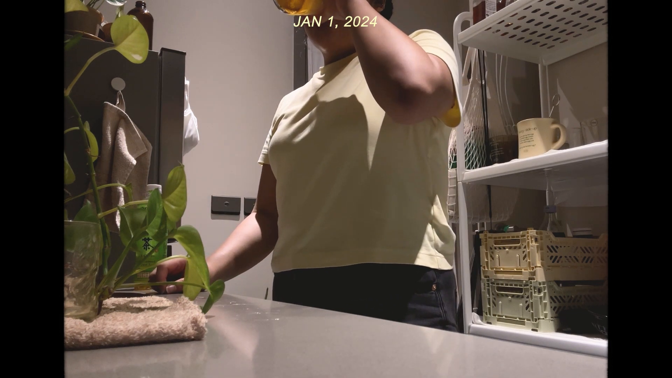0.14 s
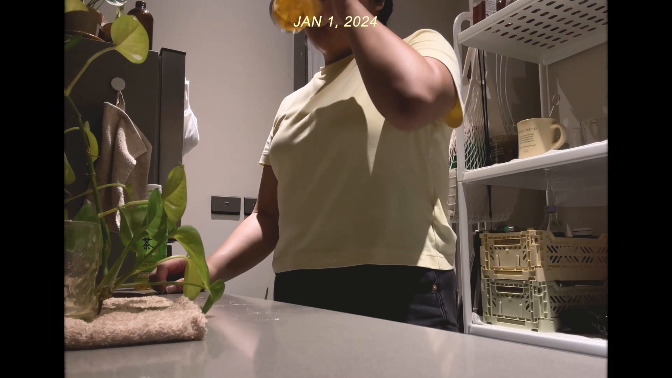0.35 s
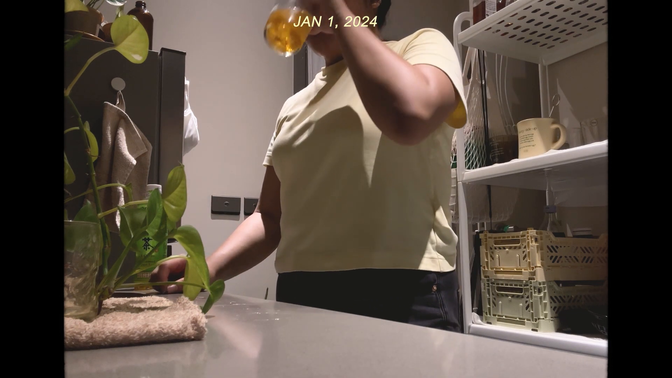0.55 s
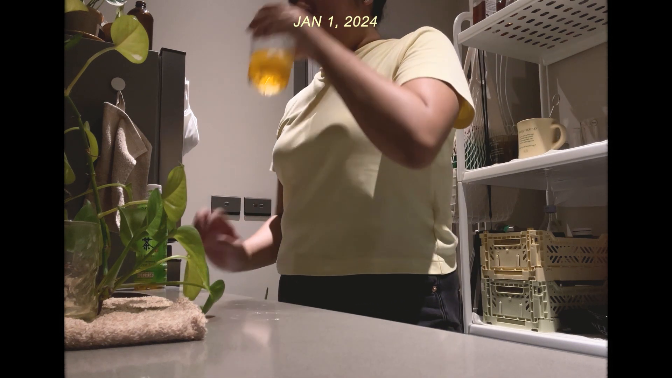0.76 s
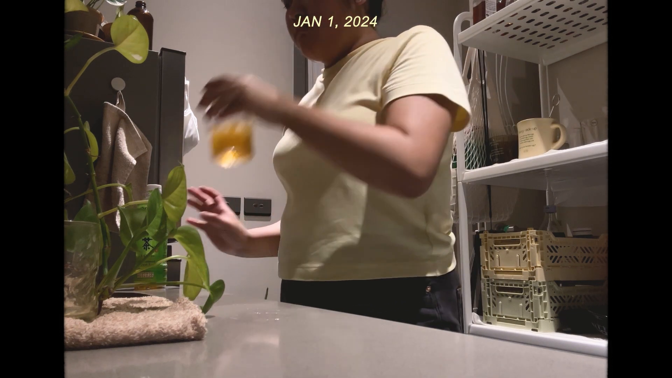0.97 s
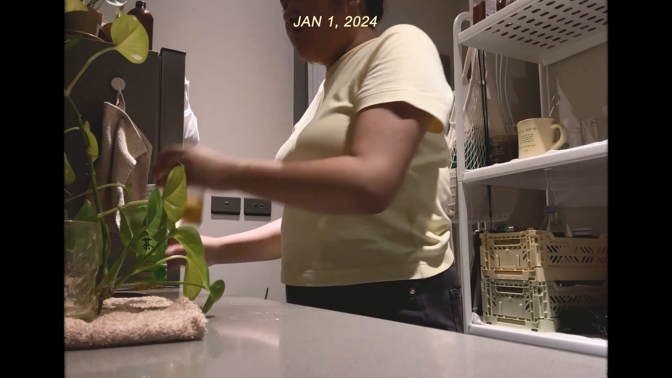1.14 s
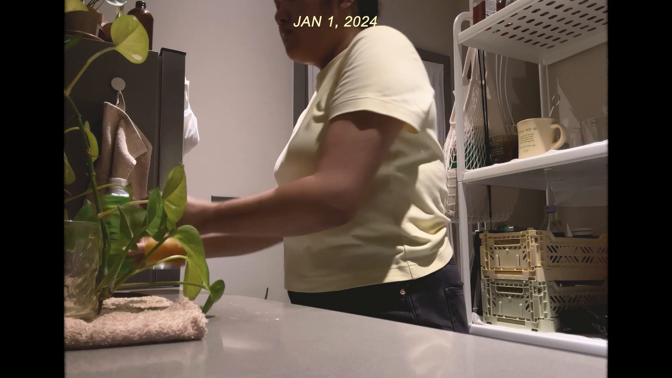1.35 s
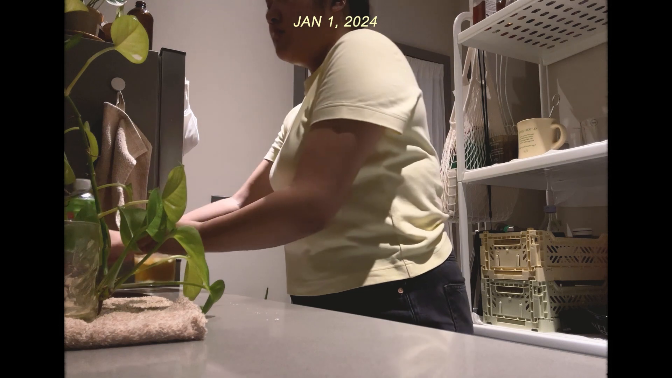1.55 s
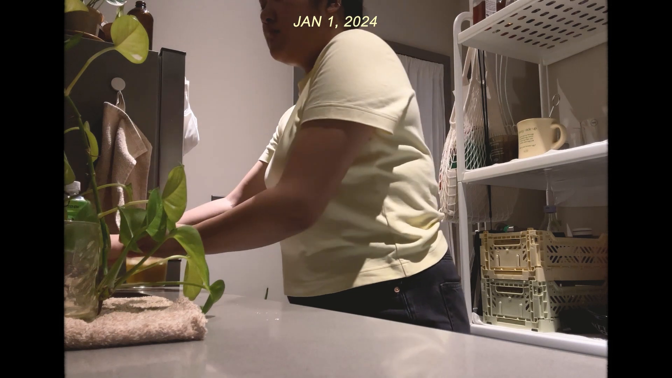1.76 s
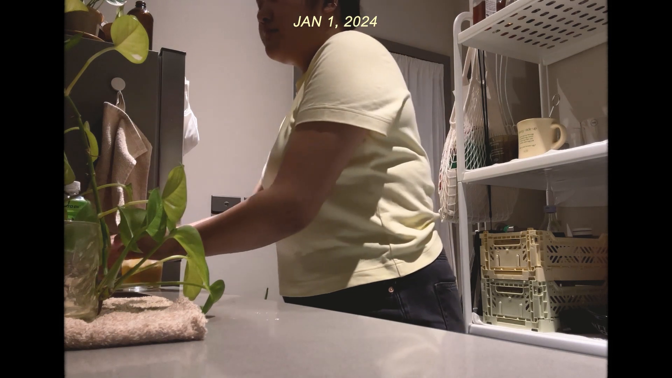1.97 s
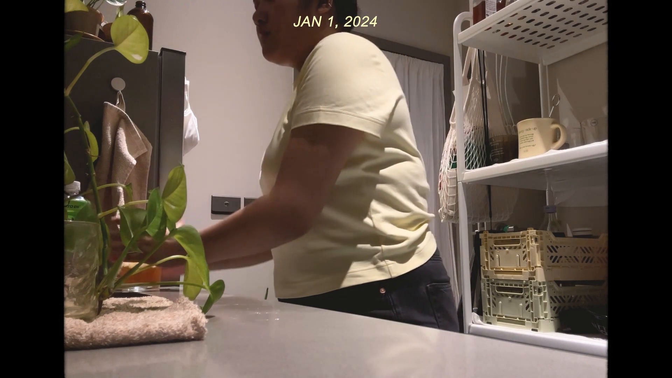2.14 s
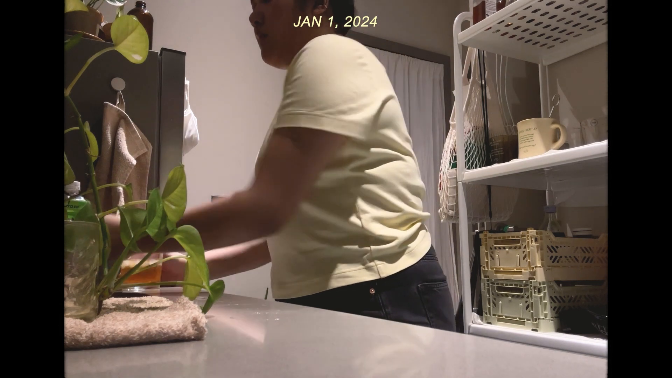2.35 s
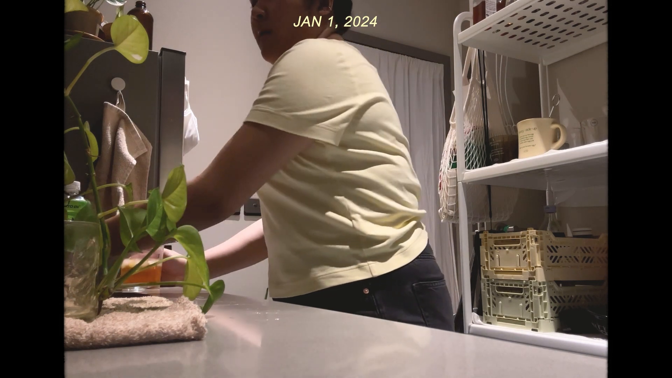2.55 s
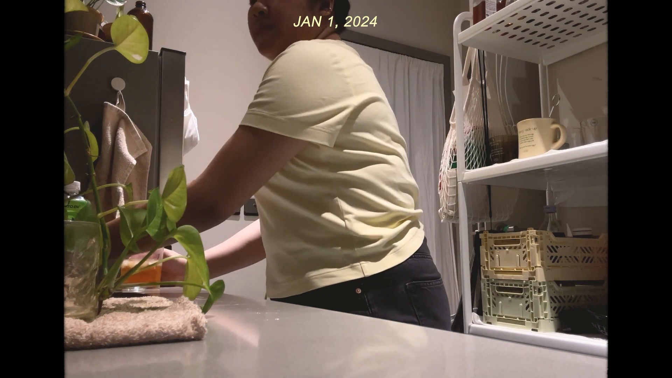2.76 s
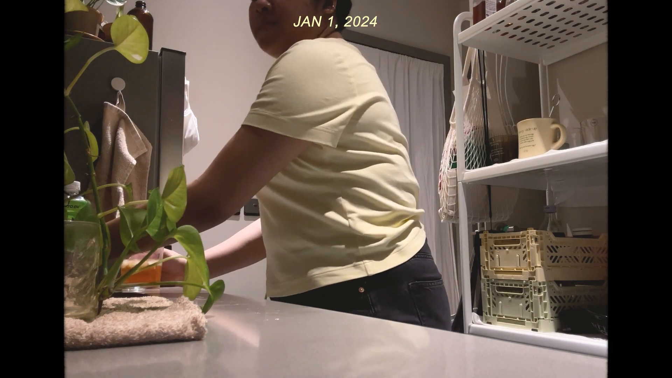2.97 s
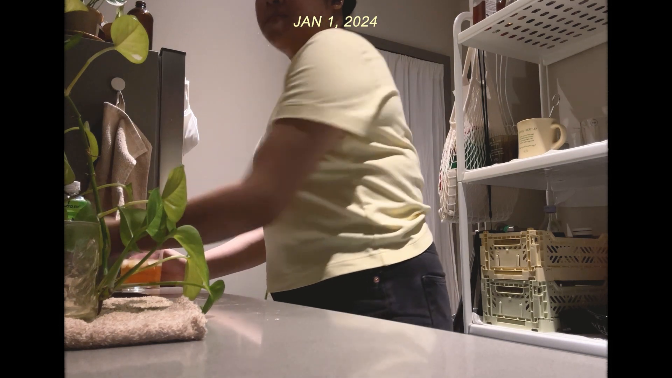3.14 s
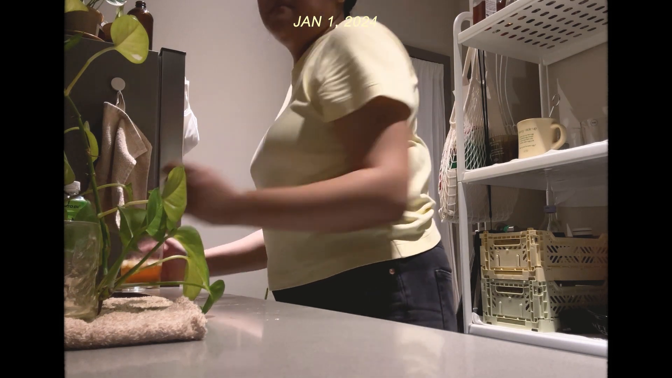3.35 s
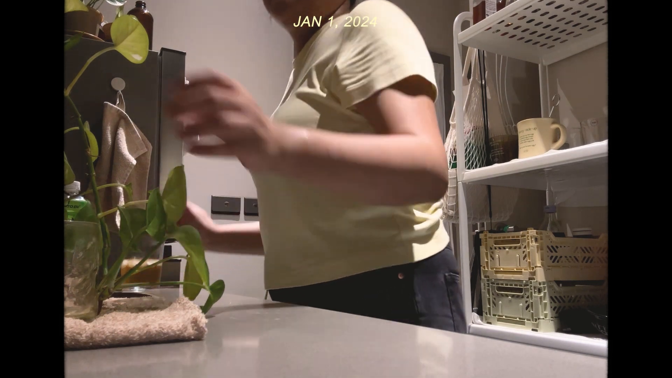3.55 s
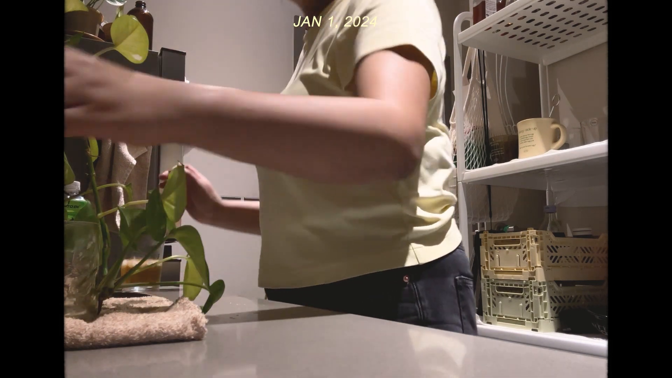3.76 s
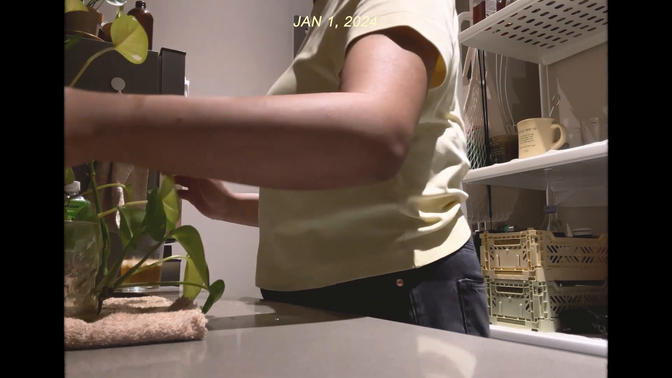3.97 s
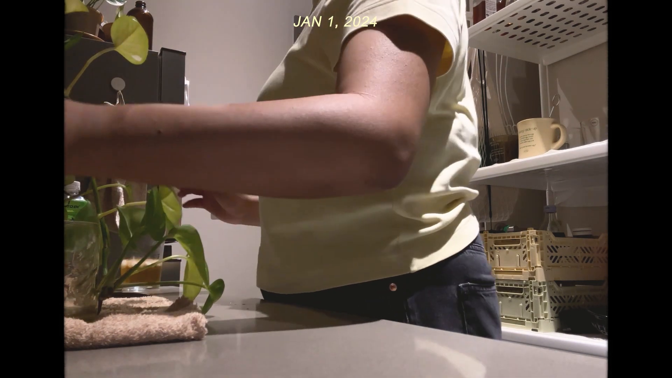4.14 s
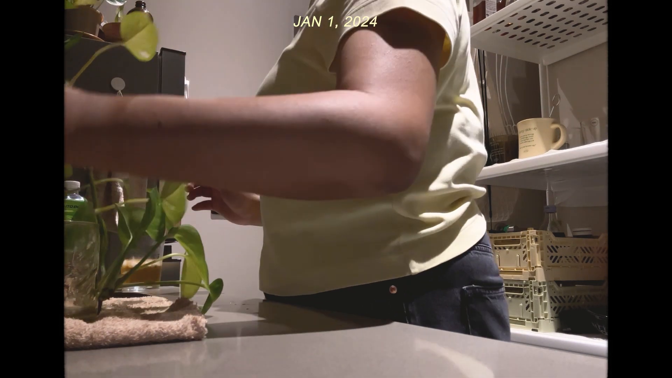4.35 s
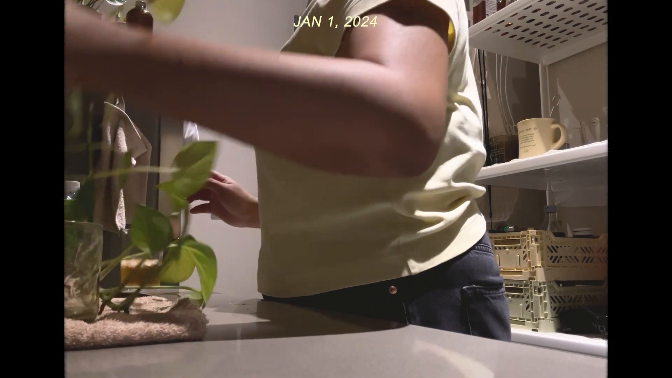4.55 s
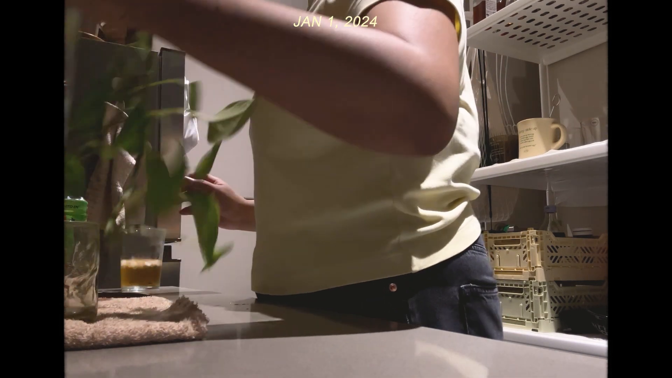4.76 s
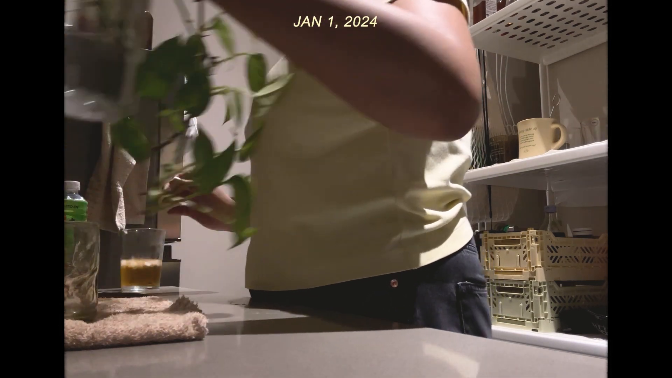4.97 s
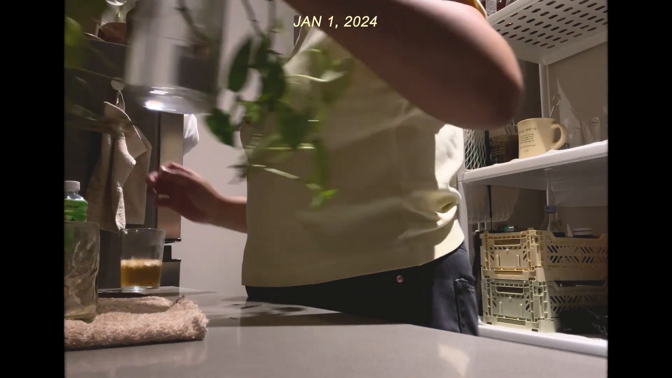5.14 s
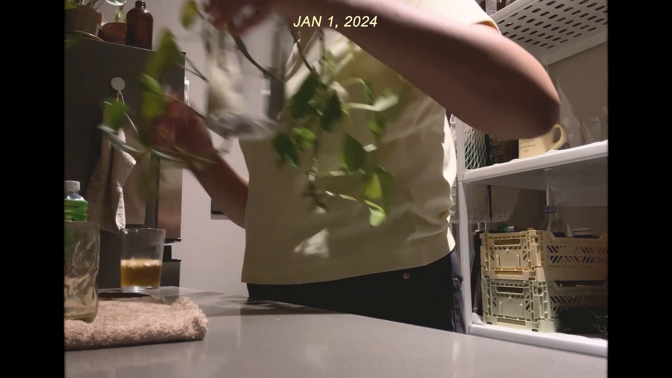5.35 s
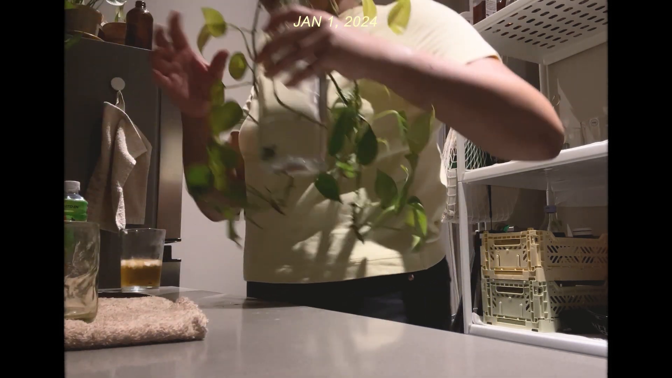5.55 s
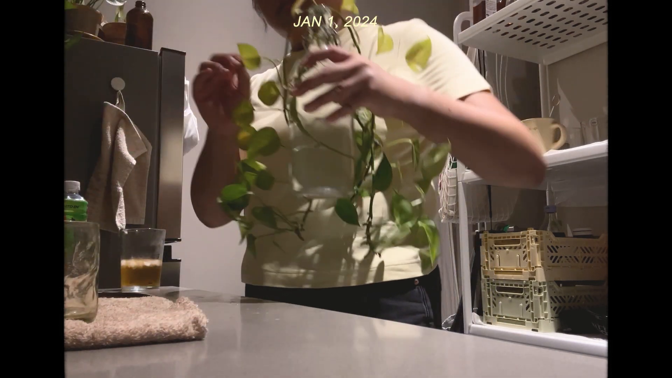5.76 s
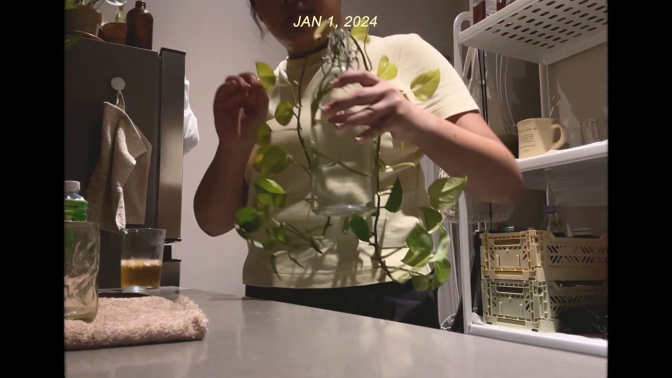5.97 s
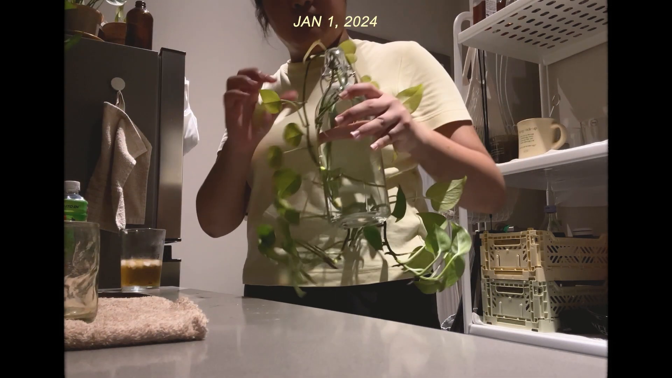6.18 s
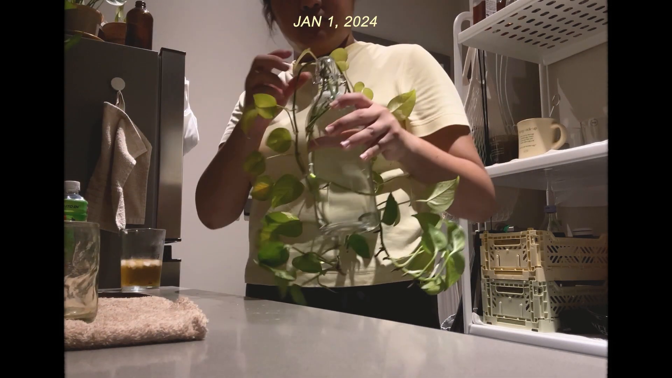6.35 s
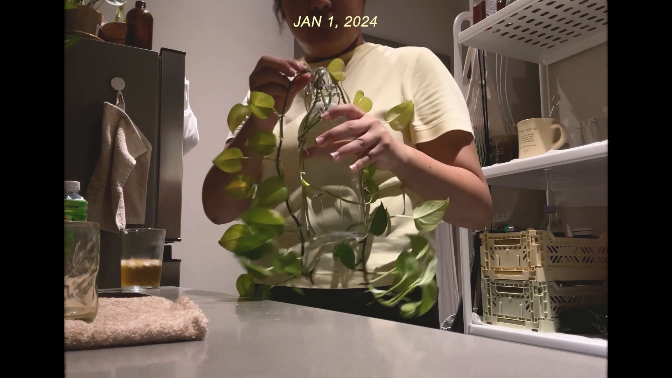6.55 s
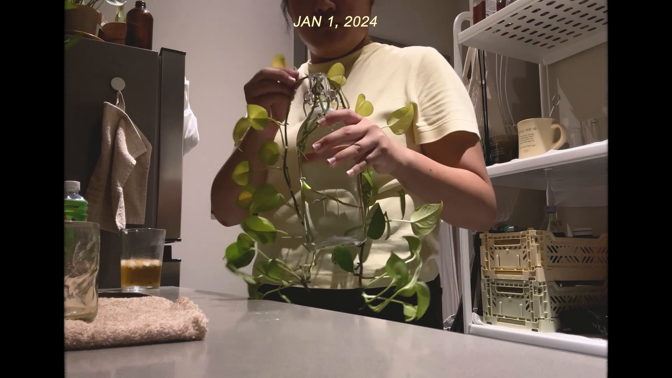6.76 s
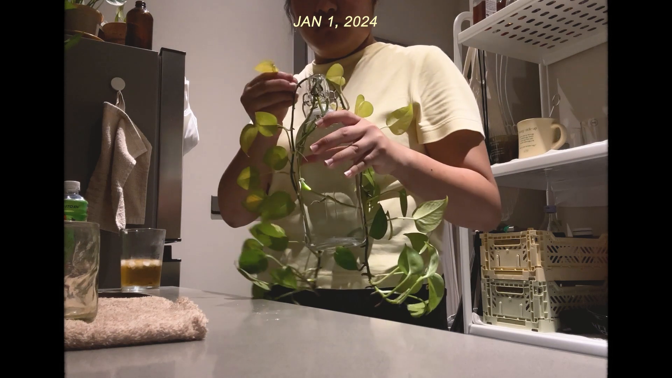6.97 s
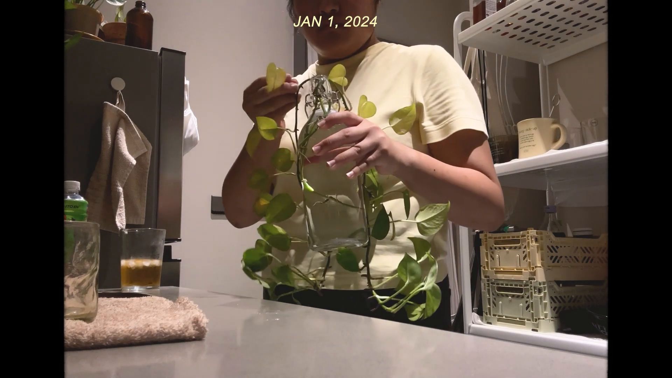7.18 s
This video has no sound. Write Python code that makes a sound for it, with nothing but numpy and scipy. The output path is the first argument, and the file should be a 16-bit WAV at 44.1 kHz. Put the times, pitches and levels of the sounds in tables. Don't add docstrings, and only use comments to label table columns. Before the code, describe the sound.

Low room drone throughout. First come light metallic ticks and clothing movement, a sharp little click, soft cabinet thumps, and one solid knock of a glass on a stone-like counter with slight sliding. Next, quiet rubbing and faint knocks. Midway, thick glass clacks in a quick burst with a high clear ring, damped by fingers. It ends with sparse leafy rustling and dry snaps, heard by two spaced microphones in a reflective kitchen.

```python
import sys
import numpy as np
from scipy import signal
from scipy.fft import rfft, irfft
from scipy.io import wavfile
from scipy.ndimage import uniform_filter1d

SR = 44100
rng = np.random.default_rng(int(sys.argv[2]) if len(sys.argv) > 2 else 0)


def makeup_ratio(level_db):
    decades = np.asarray(level_db, float) / 20
    return 10 ** decades


def int16_out(signal):
    q = np.round(np.clip(np.atleast_2d(signal).T, -1, 1) * 32767)
    wavfile.write(sys.argv[1], SR, q.astype(np.int16))


N = 317961

# start in seconds, effort in dB,
# fine grains against coarse in dB, seconds to lose 20 dB (the sign does not matter).
JOLTS = [(0.002, -94.5, 5.5, 0.6), (0.25, -71, -10, 1.9), (0.459, -58, 3.5, 0.1), (0.59, -55, 3, 0.15),
         (0.76, -65.5, 6.5, 0.08), (0.86, -72, -14, 0.1), (0.925, -70, -4, 0.2), (1.07, -56, -5, 0.22),
         (1.191, -48, -16, 0.09), (1.209, -46, 3, -0.03), (1.26, -54, 10, 0.03), (1.37, -64.5, -4.5, 0.1),
         (1.47, -63, -7, 0.1), (1.6, -68.5, -18, .5), (1.75, -72, -8, -0.2), (1.84, -73, -16.5, -0.08),
         (1.886, -53.5, -29, -0.04), (1.95, -68.5, -27.5, 0.3)]


def vase():
    # time in seconds, blow in dB, share of dull base contact in dB.
    bounces = [(4.4675, -13.5, 3), (4.488, -9.5, 2.5), (4.5035, -12.5, 2.5), (4.5203, -11.5, -0.5),
               (4.5323, -12.5, 1), (4.5434, -16, -1.5), (4.5522, -11.5, -1), (4.5564, -15.5, -1.5),
               (4.5644, -11.5, -3), (4.5742, -21, -9.5)]
    low_hz = [1450, 1817, 1835, 1929, 1933, 3800, 4012, 4039, 5380, 6597, 6641, 6690, 7640, 8390, 9405]
    high_hz = [9800, 9900, 10300, 10655, 10900, 11300, 11670, 12000, 12720, 13600, 14220, 14500]
    # level in dB, time to fade by 60 dB in seconds.
    wall_fades = [(-25, 0.24), (-12.5, 0.18), (-13.5, 0.66), (-9.5, 0.75), (-28, 0.3), (-13.5, 0.277),
                  (-17.5, 0.24), (-15.5, 0.28), (-32.5, .07), (-9, 0.1), (0, 0.2), (-6.5, 0.28),
                  (-34, 0.12), (-22, .2), (-28, 0.18), (-16.5, 0.064), (-22, 0.13), (-11.5, 0.097),
                  (-20.5, 0.21), (-20.5, 0.068), (-24, .08), (-13.5, .12), (-14, 0.07), (-15, 0.13),
                  (-9.5, 0.063), (-11.5, .12), (-27, .06)]
    opposed_hz = [1817, 1835, 3800, 6597, 6641, 6690, 8390, 9800, 10300, 10900, 11670, 12720, 14220]
    # pitch in Hz, level in dB, 60 dB fade in seconds.
    base_modes = [(547, -17, .04), (657, -15, .03), (818, -7.5, 0.063), (874.6, -4.5, .045),
                  (1130, -4.5, 0.015), (1574, -5, .02), (1774, -6, 0.09), (1861, -2.5, 0.1),
                  (1985, -8, .08), (2025, -7.5, .08), (2400, -17, 0.03), (2756, 2, .02), (2767, 3.5, 0.026),
                  (2850, -4, 0.016), (2217, -12.5, .05), (2824, -7, 0.025), (3300, -10, 0.015),
                  (3630, -7.5, 0.035), (4400, -10.5, 0.021), (5030, -13.5, 0.039), (4940, -10, 0.044),
                  (6600, -13.5, .02), (7670, -13.5, .03), (8200, -19, 0.038)]

    s, db, dull_db = np.transpose(bounces)
    walls = np.column_stack([low_hz + high_hz, wall_fades])
    opposed = np.isin(walls[:, 0], opposed_hz)
    grip = makeup_ratio(np.interp(np.arange(N) / SR, [4.89, 4.95], [0, -9]))
    alike = grip * ring(s, db - 12.0, walls[~opposed], scatter_db=7.0)
    apart = grip * ring(s, db - 12.0, walls[opposed], scatter_db=7.0)

    bases = ring(s, db + dull_db - 12.5, base_modes, scatter_db=3.0)
    crack = bursts(s, db + dull_db - 7.5, np.full(len(s), 2800.), t60=0.014)
    crack += bursts(s, db - 15.0, np.full(len(s), 9500.), t60=0.017)
    struck = band(bases + crack + makeup_ratio(-7.5) * (alike + apart), 190, 20000)
    clack = room(struck, direct_db=1.5, wet_db=-2, lag=16, pan_db=1.0)
    direct_ring = alike + np.array([np.roll(apart, shift=1), -apart])
    return clack + makeup_ratio(np.array([[1.5], [0]])) * direct_ring


def thud():
    # time in seconds, level in dB.
    rim_taps = [
        (1.835, -50),
        (2.0481, -44),
        (2.0914, -49),
    ]
    s, db = np.transpose(rim_taps)
    land = ring([1.8808], -21, [(1060, -0.5, 0.015), (625, -16.0, 0.012), (2600, -19, 0.0055)], scatter_db=3)
    return land + ring(s, db, [(1300, 7.0, .012), (940, 5, .012), (2450, -21, .01)], scatter_db=1)


def counter():
    # time in seconds, blow in dB, pitch of the object in Hz, level of its note in dB.
    knocks = [(1.186, -44.5, 890, -23), (1.207, -36.5, 2600, -18), (1.602, -46, 1500, -7),
              (1.647, -51, 1400, -4), (1.749, -51.5, 1024, -5), (1.835, -39.5, 942, -17),
              (1.88, -9.5, 1250, -31), (2.048, -40, 1300, -6), (2.092, -42.5, 1200, -6),
              (2.12, -50.5, 694, 8), (2.175, -58.5, 2050, -4.5), (2.653, -48, 890, -19),
              (2.85, -44, 1030, -10), (3.782, -46, 977, -2), (6.947, -48, 1700, -6)]
    # pitch in Hz, level in dB, 60 dB fade in seconds.
    slab_modes = [(211, -12.5, 0.052), (312, -5, 0.049), (434, -7.5, 0.046), (562, -0.5, 0.044),
                  (723, 0, 0.027), (910, 0.5, 0.02), (1070, 4, 0.013), (1234, -1.5, 0.023),
                  (1500, 2, 0.0093), (1827, 1, 0.0088), (2100, -7.5, 0.0072), (2706, -2.5, 0.0097),
                  (3030, -7.5, 0.0046), (4460, -40, .008), (5180, -11, 0.012), (8700, -22, .008)]
    s, db, note_hz, note_db = np.transpose(knocks)
    out = ring(s, db - 8, slab_modes, scatter_db=3.5)
    out += bursts(s, db - 7.5, np.full(len(s), 1600.), t60=0.02)
    for k in range(len(s)):
        note = ring(s[k:k + 1], db[k] + 10.5, [(note_hz[k], note_db[k], .012)], scatter_db=4.0)
        out -= band(note, note_hz[k] / 1.37, note_hz[k] * 1.26)
    return band(out, 210, 3500)


def slide():
    # time of the peak in seconds, level in dB, seconds to gain 20 dB, seconds to lose 20 dB.
    drags = [(1.614, -58.5, 0.02, 0.07), (1.655, -62, 0.08, 0.06), (1.86, -68, 0.4, 0.4),
             (1.881, -41.5, 0.02, 0.07), (2.49, -76, -0.5, -0.5), (2.661, -48, 0, 0.01),
             (2.73, -53, 0.07, 0.09), (2.852, -55, 0.03, 0.07), (3.05, -66.5, 0.6, 0.4),
             (3.27, -66, 0.1, .5), (4.43, -65, 0.3, -0.16), (4.466, -47, 0.05, 0.07),
             (2.06, -64, 0.7, 0.06), (2.125, -62, 0, 0)]
    # pitch in Hz, level in dB, 60 dB fade in seconds.
    tumbler_modes = [(977, -1.5, 0.01), (1300, 1, 0.0032), (1750, -7.5, .008), (2250, -5.5, 0.0085),
                     (3220, -10, 0.0062), (4100, -18, 0.0057), (5300, -24.5, 0.0064), (8700, -19.5, .012),
                     (12700, -24.5, .012)]
    grains = grit(4.5)
    body = unit(sum(makeup_ratio(db) * resonate(grains, hz, t60) for hz, db, t60 in tumbler_modes))
    return body * swells(*np.transpose(drags))


def trinkets():
    # time in seconds, peak in dB, snap against ring in dB.
    ticks = [(0.2437, -60, -19), (0.3563, -67.5, 8.5), (0.454, -46.5, 8), (0.5758, -47.5, 3),
             (0.597, -34.5, 0), (0.744, -54.5, 1), (0.8309, -59, -2.5), (0.8784, -53, -22),
             (0.9217, -49, -7), (1.055, -48.5, -4), (1.0794, -38.5, -6), (1.209, -39, 0),
             (1.3527, -42.5, -20), (1.444, -67, -5), (1.465, -48, -5.5), (1.6036, -58, 2),
             (1.7415, -52.5, -3.5), (1.836, -54.5, 5), (1.8838, -39.5, -13), (2.0063, -60, -7)]
    # pitch in Hz, level in dB, 60 dB fade in seconds.
    tick_modes = [(2165, 0.5, 0.03), (4470, 7.5, 0.02), (5095, 7, 0.027), (5990, 10, 0.01),
                  (8160, 0.5, 0.012), (8530, 5.5, 0.015), (11400, -4, 0.011), (13560, -9, .01)]
    # time in seconds, peak
    # in dB, pitch in Hz.
    pings = [(0.253, -57, 5230), (0.27, -60, 3800), (0.9218, -56.5, 4470), (1.079, -51, 4650),
             (0.4558, -51, 5950), (0.5281, -57, 5310), (0.575, -52.5, 5940), (0.595, -58, 4530),
             (0.7431, -57, 6320), (0.8309, -59, 5270), (0.877, -60, 4520), (0.9216, -57, 6150),
             (0.979, -64, 6000), (1.078, -49, 5990), (1.1786, -53, 5257), (1.3075, -48, 5950),
             (1.3527, -82, 4470), (1.444, -61, 5945), (1.9704, -60, 4550), (2.006, -54.5, 6060),
             (2.076, -59, 4680), (2.1291, -63, 4100), (2.2624, -65, 4020), (2.172, -63, 4020),
             (2.132, -63, 6160), (2.2, -64, 6020), (2.262, -66, 5990), (2.342, -68, 6150),
             (2.345, -68, 5120), (2.706, -51, 3950), (2.74, -53, 4180), (2.79, -64.5, 4220),
             (2.875, -66, 4200), (2.925, -69, 4170), (2.924, -61, 5400), (6.092, -58, 2860),
             (0.621, -51, 4400), (6.53, -61, 4380), (6.6384, -63, 4020)]
    # pitch in Hz, level in dB, 60 dB fade in seconds.
    jingle_modes = [(4020, -15, .06), (4470, -6.5, 0.037), (5243, -9.5, 0.046), (5950, 1, 0.043),
                    (6060, 3, 0.052)]

    s, db, snap_db = np.transpose(ticks)
    out = bursts(s, db + snap_db - 2, np.full(len(s), 8000.), t60=0.015)
    out += ring(s, db - 16.5, tick_modes, scatter_db=0.5)

    t = np.arange(4096) / SR
    ping_fade = np.exp(-np.log(1000) * t / 0.067)
    for start, peak_db, hz in pings:
        i = int(start * SR)
        out[i:i + len(t)] += makeup_ratio(peak_db - 6.5) * np.sin(2 * np.pi * hz * t) * ping_fade

    jingle = np.zeros(N)
    for hz, level_db, t60 in jingle_modes:
        jingle += makeup_ratio(level_db + 2.5 * walk(2.5)) * resonate(grit(4.5), hz, t60)
    s, db, _, rise_s, fall_s = moves()[:, :len(JOLTS)]
    return band(out + unit(jingle) * swells(s, db - 11, rise_s, fall_s), 1400, 12500)


def snaps():
    # time in seconds, peak in dB, centre in Hz.
    dry_cracks = [(2.478, -53, 3400), (2.5286, -61, 12000), (2.5436, -55.5, 11000), (2.584, -47.5, 3000),
                  (2.502, -54, 3400), (2.652, -60, 2600), (2.866, -63, 5200), (2.587, -58, 8900),
                  (2.556, -66, 7000), (2.711, -56, 3400), (2.9217, -53, 5500), (4.382, -56, 6000),
                  (4.4186, -50, 4900), (5.316, -60.5, 1200), (5.637, -51.5, 4910), (5.6545, -48.5, 6200),
                  (5.674, -50.5, 5200), (5.8955, -53, 2600), (5.676, -52, 10000), (5.639, -58, 9490),
                  (6.9032, -62, 9000), (6.9456, -43, 2500), (6.9856, -53, 4020), (6.03, -70, 10530),
                  (6.09, -62.5, 9000), (6.4975, -56.5, 3220), (6.5294, -55, 4310), (6.614, -50, 4040),
                  (6.9463, -37.5, 5170), (6.985, -42, 10540), (7.06, -57.5, 7700), (7.4, -62.5, 9000),
                  (7.0994, -66, 7500)]
    # time in seconds, peak in dB.
    sharp_cracks = [(0.4549, -46), (0.574, -43), (1.076, -70), (1.208, -27.5), (1.261, -40), (1.8369, -65),
                    (2.589, -65), (5.676, -64), (6.9455, -39.5), (6.959, -62.5), (6.9838, -62)]
    out = bursts(*np.transpose(dry_cracks), t60=0.013, spread=1.4) * makeup_ratio(4.5)
    s, db = np.transpose(sharp_cracks)
    return out + bursts(s, db + 7.0, np.full(len(s), 14000.), t60=0.0081)


def rustle():
    s, db, fine_db, rise_s, fall_s = moves()
    coarse = unit(band(grit(3.0), 2400, 7200)) * makeup_ratio(-6.0 + 0.83 * walk(30))
    fine = unit(band(grit(4.5), 7500, 11000)) * makeup_ratio(-3.0 + 2.0 * walk(24))
    fine_fall_s = fall_s / 1.4
    return coarse * swells(s, db, rise_s, fall_s) + fine * swells(s, db + fine_db, rise_s, fine_fall_s)


def moves():
    # time of the peak in seconds, effort in dB,
    # fine grains against coarse in dB, seconds to gain 20 dB, seconds to lose 20 dB.
    strokes = [(2.485, -81, -29, 2.3, -3), (2.548, -87, 10, -0.5, 0), (2.59, -84, 11, -0.46, 0),
               (2.665, -71, -20, .01, 0.1), (2.72, -61, -25, 0.15, 0.05), (2.855, -68, -22, 0.2, -0.03),
               (2.87, -76, -20, .02, 0.5), (2.925, -66, -9, 0.1, 0.35), (3.39, -71, -19, .5, -0.14),
               (4.1, -90, -23, -1, 0.7), (4.42, -65.5, -4.5, 0.1, 0.7), (4.68, -69.5, -13.5, 0.5, 0.3),
               (4.855, -62, -20.5, 0.33, 0.08), (4.8, -81, 3, 0.6, 0.3), (5.53, -75, -6, 0.4, 0),
               (5.675, -71, -6.5, 0.19, 0.4), (5.76, -76, -13, 0.4, 0.5), (5.91, -65.5, -2.5, 0.08, 0.15),
               (6.05, -72, 1, -0.57, 0.17), (6.11, -67, -2, -0.03, 0.1), (6.545, -63.5, -11, 0.16, 0.05),
               (6.625, -63, -6, 0.08, 0.02), (6.89, -86, 11.5, 0.02, 0.4), (6.951, -57, 1, 0.02, 0.02),
               (2.13, -94.5, 15, -0.7, 0.4)]
    s, db, fine_db, fall_s = np.transpose(JOLTS)
    rise_s = np.full(len(s), 0.017)
    return np.vstack([np.column_stack([s, db, fine_db, rise_s, fall_s]), strokes]).T


def cabinet():
    # time in seconds, level in dB, share of the panel in dB.
    thumps = [
        (1.224, -29, -14),
        (1.616, -26.5, -18.5),
        (1.654, -30, -16.5),
        (1.79, -36.5, -22),
        (1.886, -23, -22),
    ]
    # pitch in Hz, level in dB, 60 dB fade in seconds.
    cabinet_modes = [(119.3, -2, 0.23), (191.7, -11.5, 0.059)]
    s, db, panel_db = np.transpose(thumps)
    body = ring(s, db - 0.5, cabinet_modes, scatter_db=3.5)
    panel = ring(s, db + panel_db + 6.0, [(344.5, 0.0011, 0.11)], scatter_db=2.5)
    return band(body + panel, 120, 477)


def hum():
    # frequency in Hz, level in dB per Hz.
    tone_colour = [(12, -42), (20, -14), (87, -2.5), (147, -3.5), (205, -3), (286, -7.5), (398, -19),
                   (555, -19.5), (994, -25.5), (2550, -44.5), (3270, -48.5), (3860, -56), (10500, -63.5),
                   (11700, -70), (15000, -80)]
    # resonance of the room in Hz, width in Hz, lift in dB.
    room_modes = [(64.4, 16, 5), (115.5, 5, 14), (195, 52, 6.5), (271, 18, 3), (3340, 57, 6)]
    # time in seconds, level of the drone in dB.
    drone_level = [(0.0, -49), (0.76, -48), (1.16, -45), (1.81, -45.5), (2.39, -47), (2.87, -44),
                   (3.45, -46), (4.72, -45), (5.02, -44.5), (5.74, -45), (7.21, -46)]

    hz = np.maximum(np.arange(N // 2 + 1) * SR / N, 1)
    colour_hz, colour_db = np.transpose(tone_colour)
    db = np.interp(np.log(hz), np.log(colour_hz), colour_db)
    for centre_hz, width, lift_db in room_modes:
        db = db + lift_db / (1 + (2 * (hz - centre_hz) / width) ** 2)
    air = irfft(rfft(pair(N + N % 2)[:, :N]) * makeup_ratio(db), N)
    air[1] = np.roll(air[1], shift=12)
    low = signal.sosfiltfilt(signal.butter(2, 450, fs=SR, output="sos"), air)
    scale = 1 / np.sqrt(np.mean(low ** 2))
    swell_db = np.interp(np.arange(N) / SR, *np.transpose(drone_level))
    drone = low * makeup_ratio(swell_db + 0.32 * walk(3.6))
    hiss = (air - low) * makeup_ratio(-42.5 + 0.2 * walk(10))
    return scale * (drone + hiss)


def room(x, direct_db, wet_db, lag, pan_db, lasts=1):
    # frequency in Hz, time for echoes to fade by 60 dB in seconds.
    echo_fades = [(150, 0.68), (700, 0.26), (3000, 0.26), (9000, 0.16), (15000, 0.047)]
    t = np.arange(SR // 2) / SR
    hz, s, cells = signal.stft(pair(len(t)), SR, nperseg=512)
    fade_hz, fade_s = np.transpose(echo_fades)
    t60 = lasts * np.interp(np.log(hz + 1), np.log(fade_hz), fade_s)
    fading = cells / np.abs(cells) * np.exp(-np.log(1000) * s / t60[:, None])
    tail = signal.istft(fading, nperseg=512)[1][:, :len(t)] / 37
    early = 1 + 2.64 * np.exp(-t / 0.0073)
    echo = makeup_ratio(wet_db - 27.0) * tail * early * (1 - np.exp(-t / 0.0023))
    spectrum = rfft(echo, SR)
    power = np.abs(spectrum) ** 2
    fine = uniform_filter1d(power, size=90) + 1e-12
    broad = uniform_filter1d(power, size=1200) + 1e-12
    echo = irfft(spectrum * np.sqrt(broad / fine), SR)[:, :len(t)] * (1 - np.exp(-t / .0005))
    echo[0] *= makeup_ratio(pan_db)
    echo[0, 25 + lag] += makeup_ratio(direct_db + pan_db)
    echo[1, 25] += makeup_ratio(direct_db)
    return signal.fftconvolve(x[None], echo)[:, :N]


def pair(size):
    both, left, right = rfft(rng.standard_normal((3, size)))
    alike = 1 / (1 + (np.arange(len(both)) * SR / size / 355) ** 4)
    return irfft(np.sqrt(alike) * both + np.sqrt(1 - alike) * np.array([left, right]), size)


def ring(times, blow_db, modes, scatter_db):
    chance = rng.standard_normal((len(times), len(modes)))
    at = (np.array(times) * SR).astype(int)
    out = np.zeros(N)
    for k, (hz, db, t60) in enumerate(modes):
        end = min(at[-1] + int(2 * t60 * SR) + 512, N)
        blows = np.zeros(end - at[0])
        blows[at - at[0]] = makeup_ratio(blow_db + db + scatter_db * chance[:, k])
        out[at[0]:end] += (-1) ** k * resonate(blows, hz, t60)
    return out


def resonate(x, hz, t60):
    pole = np.exp(2j * np.pi * hz / SR - np.log(1000) / (max(t60, .004) * SR))
    return signal.lfilter([1], [1, -pole], x).imag


def bursts(times, peak_db, centre_hz, t60, spread=1.83):
    out = np.zeros(N)
    t = np.arange(2048) / SR
    noise = rng.standard_normal((len(times), len(t))) * np.exp(-np.log(1000) * t / t60)
    for s, db, hz, crack in zip(times, peak_db, centre_hz, noise):
        i = int(s * SR)
        out[i:i + len(t)] += makeup_ratio(db) * band(crack, hz / spread, hz * spread)[:N - i]
    return out


def grit(spread_db):
    return rng.standard_normal(N) * makeup_ratio(spread_db * np.minimum(rng.exponential(size=N), 4))


def swells(times, peak_db, rise_s, fall_s):
    t = np.arange(0, N + 32, 32) / SR
    late = t - np.array(times)[:, None]
    span = np.where(late < 0, -np.abs(rise_s)[:, None], np.abs(fall_s)[:, None])
    power = np.sum(makeup_ratio(peak_db[:, None] - 20 * late / span) ** 2, axis=0)
    return np.interp(np.arange(N) / SR, t, np.sqrt(power))


def walk(rate):
    k = int(SR / rate)
    return uniform_filter1d(np.repeat(rng.standard_normal(N // 500), k)[:N], k)


def band(x, lo_hz, hi_hz):
    return signal.sosfilt(signal.butter(2, [lo_hz, min(hi_hz, .45 * SR)], "band", fs=SR, output="sos"), x)


def unit(x):
    return x / np.sqrt(np.mean(x ** 2))


def scene():
    near = vase()
    slab = room(counter() + slide(), direct_db=-5.5, wet_db=0.5, lag=2, pan_db=-0.2)
    shaken = room(trinkets(), direct_db=-1.5, wet_db=3.5, lag=4, pan_db=-1.1)
    rubbed = room(snaps() + rustle(), direct_db=-3.5, wet_db=-1.0, lag=4, pan_db=-0.3)
    mix = near + slab + shaken + rubbed + cabinet() + hum() + thud()
    left_db = -2.5
    return mix * makeup_ratio(np.array([[left_db], [-left_db]]) / 2)


def band_limit(x):
    return signal.sosfilt(signal.butter(12, 15820, fs=SR, output="sos"), x)


def record(dry):
    # frequency in Hz, level of both microphones in dB.
    mic_colour = [(3000, 0.5), (6000, 0), (7100, -5.5), (8200, -0.5), (11000, -2.5), (13500, -7.5),
                  (15000, -12.5), (15700, -26)]
    # frequency in Hz, left microphone against right in dB.
    left_against_right = [(60, -1), (350, 1), (750, -2), (1500, 1), (3000, -0.5), (6000, -2), (10000, 2.5)]
    f = np.arange(N // 2 + 1) * SR / N
    hz, db = np.transpose(mic_colour)
    colour = makeup_ratio(np.interp(np.log(f + 1), np.log(hz), db))
    tilt_db = np.interp(f, *np.transpose(left_against_right))
    colour = colour * makeup_ratio(tilt_db * np.array([[.5], [-.5]]))
    heard = irfft(rfft(dry) * colour, N)
    top_cut = signal.ellip(8, .2, 70, 15700, fs=SR, output="sos")
    return band_limit(signal.sosfilt(top_cut, heard))


dry = scene()
out = record(dry)
int16_out(out)
```